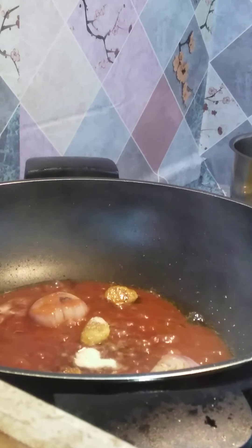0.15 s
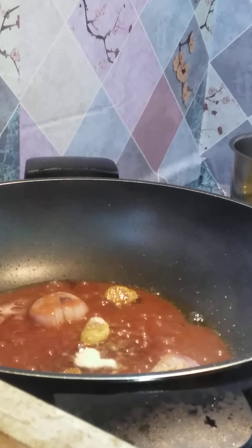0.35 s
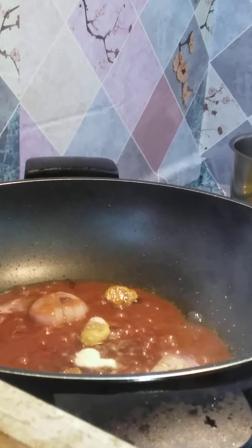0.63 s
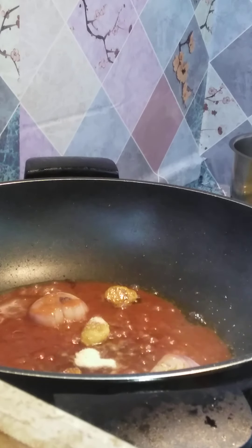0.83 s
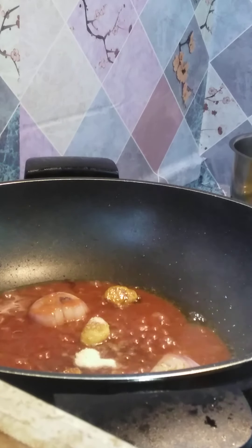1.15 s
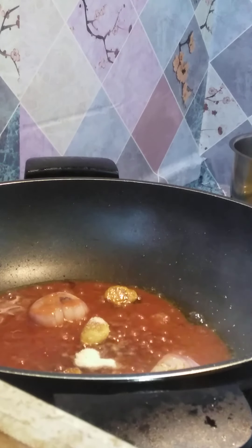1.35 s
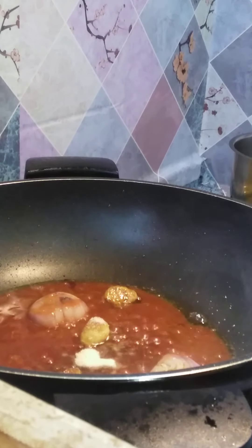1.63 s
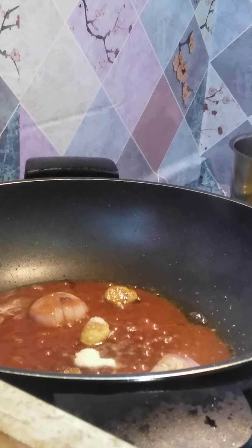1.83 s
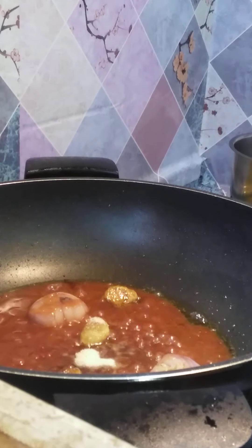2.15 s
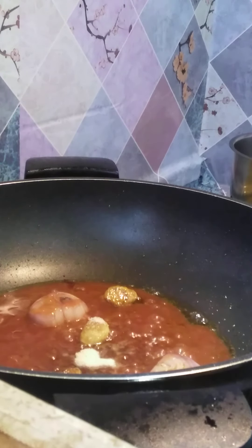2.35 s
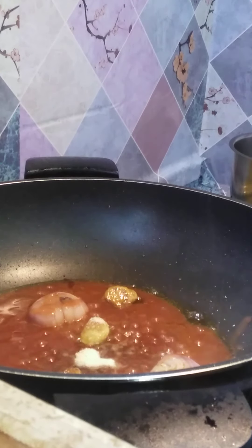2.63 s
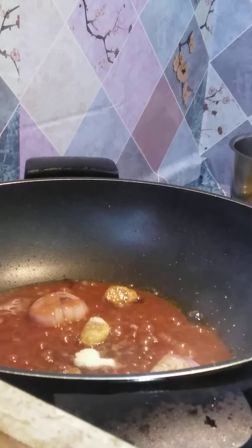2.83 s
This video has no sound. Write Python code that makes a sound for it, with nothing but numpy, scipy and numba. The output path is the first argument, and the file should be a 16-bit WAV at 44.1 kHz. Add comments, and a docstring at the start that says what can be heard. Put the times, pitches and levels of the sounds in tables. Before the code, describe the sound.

Thick sauce simmering in a wok, bubbling and crackling, with a pop and a knock.

```python
"""Sauce simmering in a wok

A thick sauce simmers in a small kitchen, heard by a phone close above the rim. Bubbles ring as tiny
resonators: the smallest fizz and flare up in spits, larger ones burble near 1 kHz, and one big one pops.
Something knocks across the room; a hum comes and goes. The spectra include the microphone's 9 kHz peak."""
import sys
import numpy as np
from scipy import signal
from scipy.fft import rfft, irfft
from scipy.io import wavfile
from scipy.ndimage import uniform_filter1d
from numba import njit

SR = 44100
rng = np.random.default_rng(int(sys.argv[2]) if len(sys.argv) > 2 else 0)


def store_wav(level_fs):
    """Save 16-bit WAV to argv[1]."""
    pcm = np.round(np.clip(np.atleast_2d(level_fs), -1, 1) * 32767)
    wavfile.write(sys.argv[1], SR, pcm.T.astype(np.int16))


N = 132300

# Spectrum of the room's rumble. Each row: frequency in Hz, relative density in dB.
RUMBLE_SPECTRUM = [(15, -46), (25, 5), (102, 10.5), (345, 4.5), (425, -17), (538, 2), (609, -44),
                   (680, -39.5), (880, 17), (1500, -120)]
# Envelope of the hum. Each row: time in seconds, level in dB.
HUM_LEVELS = [(0.0, -48.5), (0.08, -53), (0.12, -61), (0.22, -44.5), (0.26, -67), (0.32, -56), (0.37, -72),
              (0.78, -98.5), (0.83, -55), (0.89, -46.5), (1.04, -79), (1.38, -72), (1.43, -48.5),
              (1.72, -76), (1.75, -86), (1.84, -59), (1.94, -95), (1.99, -54), (2.01, -47), (2.06, -74),
              (2.18, -58), (2.31, -81), (2.33, -61), (2.51, -87), (2.55, -77), (3.0, -81)]
# Spectrum of the knock. Each row: frequency in Hz, relative density in dB.
KNOCK_SPECTRUM = [(35, -56), (60, -20), (730, -11), (988, -8.5), (1310, -12), (1610, 0), (2890, -12.5),
                  (3740, -14.5), (4200, -18.5), (6110, -19.5), (7020, -19), (8670, -10), (15900, -52)]
# Resonances of the knocked object. Each row: frequency in Hz, width in Hz, relative level in dB.
KNOCK_RESONANCES = [(960, 180, 10), (1602, 13, 18), (1680, 47, -11), (2150, 120, 21), (2320, 120, -13),
                    (2460, 40, -22)]
# Spectrum of the mid-sized bubbles. Each row: frequency in Hz, relative density in dB.
BURBLE_SPECTRUM = [(330, -60), (560, -34), (625, -31), (812, -3), (1040, 0), (1360, -5.5), (1620, -4),
                   (2020, -8.5), (2220, -7.5), (3200, -27), (4160, -32), (7040, -120)]
# Envelope of the burble. Each row: time in seconds, level in dB.
BURBLE_LEVELS = [(0.0, -43), (0.18, -46.5), (0.32, -45), (0.56, -48), (0.93, -44), (1.31, -48), (1.69, -45),
                 (1.91, -47), (2.55, -46), (2.72, -44), (3.0, -45)]
# Larger bubbles breaking. Each row: start in seconds, relative level in dB, centre in Hz,
# length in seconds.
BREAKING_BUBBLES = [(0.139, -37, 955, 0.034), (0.272, -27.5, 1000, 0.016), (0.333, -24.5, 1320, 0.022),
                    (0.814, -46, 1030, 0.027), (0.87, -37, 1110, 0.014), (0.902, -28.5, 1180, 0.0086),
                    (0.937, -25.5, 2650, 0.021), (1.136, -47, 1210, 0.015), (1.163, -26, 1630, 0.018),
                    (1.235, -41, 1010, 0.016), (1.592, -22.5, 1110, 0.025), (1.957, -28.5, 1120, 0.011),
                    (1.999, -40, 970, 0.023), (2.19, -26.5, 1600, 0.023), (2.544, -19.5, 1560, 0.017),
                    (2.75, -31, 1850, 0.022), (2.846, -30.5, 1440, 0.031), (2.929, -38, 970, 0.017)]
# Low gurgles. Each row: start in seconds, level in dB, centre in Hz, length in seconds.
LOW_GURGLES = [(.46, -62, 275, 0.08), (.53, -61.5, 620, 0.064), (.63, -58.5, 565, 0.034),
               (.68, -61, 273, 0.079), (.95, -66, 276, 0.062), (1.1, -76, 270, .06),
               (1.53, -59.5, 332, 0.094), (1.55, -53, 483, 0.024), (1.692, -37.5, 335, .03),
               (2.54, -53.5, 560, 0.049), (2.93, -63, 512, .07)]
# Spectrum of the tiny bubbles. Each row: frequency in Hz, relative density in dB.
FIZZ_SPECTRUM = [(1530, -33), (2600, -16), (5100, -19), (7010, -11.5), (8540, -1), (10700, -6),
                 (11900, -13), (15100, -22.5), (15900, -25)]
# Envelopes of the fizz. Each row: time in seconds, upper treble level in dB, lower treble level in dB.
FIZZ_LEVELS = [(0.0, -40.5, -48.5), (0.48, -40, -55.5), (0.78, -40.5, -54), (1.49, -39.5, -53.5),
               (1.62, -36, -51), (1.9, -43.5, -56.5), (2.19, -36, -50), (2.49, -41.5, -55),
               (2.73, -39, -50.5), (3.0, -41, -56)]
# Spectrum of the big bubble's pop. Each row: frequency in Hz, relative density in dB.
POP_SPECTRUM = [(35, -48), (60, -36), (362, -8), (747, -18.5), (1770, 2), (2090, -14.5), (3330, -26),
                (4110, -9), (4400, -19), (5180, -6.5), (7530, -9), (8870, 3), (15900, -31)]
# Spits of the sauce. Each row: start in seconds, relative level in dB, centre in Hz, top octave gain
# in dB, lower treble gain in dB, length in seconds, opening tick gain in dB.
SPIT_EVENTS = [(0.0114, -29, 8200, 3, -11, 0.022, -11), (0.07, -46, 10200, -17, -12, 0.022, -3),
               (0.077, -28, 8230, -6, -4.5, 0.017, -6), (0.139, -15, 8530, -16, -26, 0.015, 5),
               (0.18, -21, 9600, -16, -21, 0.022, -3), (0.3025, -17.5, 9940, -13, -12.5, 0.022, 3),
               (0.361, -26, 8900, -2, -20, 0.036, -3), (0.425, -29, 8850, -26, -20, 0.027, -3),
               (0.476, -24.5, 8900, -18, -14, 0.013, -7), (0.5232, -21.5, 8700, -24, -18, 0.0081, 7),
               (0.572, -18.5, 9920, -10, -37, 0.0088, -1), (0.614, -27, 9100, -8, -14, 0.018, -3),
               (0.633, -22.5, 9000, -23, -16, 0.025, 2), (0.679, -27.5, 8000, -19, -6, 0.035, -3),
               (0.758, -21.5, 8400, -19, -42, 0.029, -3), (0.7844, -29, 7840, 1, -32, 0.026, -3),
               (0.941, -17.5, 8360, -7, -19, 0.015, -9), (0.97, -15, 8400, -17, -36, 0.016, -3),
               (0.9845, -15, 9060, -15, -48, 0.022, 14), (1.04, -27.5, 8400, -21, -35, 0.043, -5),
               (1.058, -29, 10500, -21, -20, 0.017, -5), (1.1025, -25.5, 8650, -18, -6, 0.017, 1),
               (1.1247, -20, 10500, -12, -29, 0.015, 6), (1.1734, -46, 8620, -19, -21, 0.022, -5),
               (1.2397, -21, 8360, -32, -14.5, 0.025, 2), (1.2984, -23, 9000, -23, -39, 0.019, 4),
               (1.319, -22.5, 8800, -27, -32, 0.024, -3), (1.39, -33, 8250, -21, -28, 0.019, -5),
               (1.437, -23, 9320, -5, -14, 0.0088, 1), (1.4715, -24, 8600, -5, -34, 0.03, -8),
               (1.491, -23.5, 9400, -13, -12.5, 0.038, 13), (1.543, -20, 9450, -6, -14, 0.014, 5),
               (1.5766, -19, 8700, 1.5, -20, 0.02, -6), (1.677, -18.5, 9400, -9, -29, 0.015, -6),
               (1.7205, -17, 9020, -33, -7, 0.016, -11), (1.825, -35, 10700, -26, -29, 0.017, -3),
               (1.8764, -14, 9160, -30, -33, 0.029, -1), (1.893, -24, 9100, -23, -36, 0.024, -7),
               (1.972, -21.5, 9140, -17, -31, 0.01, 1), (1.989, -23, 9100, -9, -15, 0.033, -3),
               (2.0847, -19, 8340, -31, -11, 0.017, 10), (2.165, -23.5, 6300, -27, -19, 0.017, 1),
               (2.1975, -14.5, 8960, -31, -27, 0.018, -5), (2.2114, -21.5, 9400, -35, -33, 0.034, -7),
               (2.366, -21.5, 8770, -18, -18, 0.029, -11), (2.475, -26, 8850, -17, -21, 0.022, -3),
               (2.5412, -13.5, 8360, -14, -27, 0.022, 9), (2.582, -18, 10200, -11, -12.5, 0.034, 1),
               (2.605, -19, 8500, -16, -22, 0.019, 8), (2.6907, -18, 8690, -29, -31, 0.017, 7),
               (2.726, -30, 8800, -20, -25, 0.017, 0), (2.745, -25, 8600, -21, -24, 0.018, 1),
               (2.804, -19.5, 9700, -9, -13, 0.016, -7), (2.8504, -31, 8900, -26, -27, 0.013, -3),
               (2.873, -19.5, 8700, -19, -19, 0.019, -3), (2.9104, -34.5, 9100, -24, 3.5, 0.033, 1),
               (2.9604, -26, 9090, -21, -14, 0.022, -3), (2.991, -19, 9000, -9, -31, 0.022, -3)]


def undb(db):
    """Decibels are logarithmic: every 20 dB multiplies the amplitude by ten."""
    return 10 ** (np.asarray(db) / 20)


def unit(x):
    """Normalisation to an rms of 1."""
    return x / np.sqrt(np.mean(x ** 2))


def envelope(rows):
    """Gain over time, interpolated between (seconds, dB) points."""
    return undb(np.interp(np.arange(N) / SR, *np.array(rows).T))


def colour(x, spectrum):
    """Spectral shaping through (Hz, dB) points; rms 1."""
    points_hz, points_db = np.array(spectrum).T
    hz = np.maximum(np.arange(len(x) // 2 + 1) * SR / len(x), 1)
    gain = undb(np.interp(np.log(hz), np.log(points_hz), points_db, left=-90, right=-90))
    return unit(irfft(rfft(x) * gain, len(x)))


def resonate(x, hz, width_hz):
    """Two equal resonators in cascade pass a band around hz; rms 1."""
    f = np.arange(len(x) // 2 + 1) * SR / len(x)
    return unit(irfft(rfft(x) / (1 + 2j * (f - hz) / width_hz) ** 2, len(x)))


def clicks(size, per_s, scatter_db):
    """Shot noise: dense random impulses, a few much stronger than the rest."""
    chance, polarity, strength = rng.random((3, size))
    impulses = (chance < per_s / SR) * np.sign(polarity - .5)
    return impulses * undb(-scatter_db * np.log(1 - strength)) + 1e-9 * polarity


def wander(per_s):
    """Slow random modulation: ramps between per_s values a second; rms 1."""
    hold = int(SR / per_s)
    steps = np.repeat(rng.standard_normal(N // hold + 1), hold)
    return unit(uniform_filter1d(steps, hold)[:N])


def patchy(x, depth_db=2.2):
    """Independent amplitude modulation: each tenth of an octave swells and sinks on its own."""
    spectrum = rfft(x)
    tenths = 10 * np.log2(np.arange(1, N // 2 + 2) * SR / N / 600)  # counted from 600 Hz
    bands = (irfft(spectrum * np.clip(1 - np.abs(tenths - k), 0, 1), N) for k in range(-2, 49))
    return sum(band * undb(depth_db * wander(per_s=7.61)) for band in bands)


def add(out, start_s, x):
    """Superposition: x joins the mix at start_s."""
    i = int(start_s * SR)
    out[i:i + len(x)] += x[:N - i]


def burst(attack_s, length_s, size=8192):
    """Transient envelope: a quick rise, a short plateau, then decay with time constant length_s / 2."""
    t = np.arange(size) / SR
    rise = 1 - np.exp(-t / attack_s)
    return rise / np.sqrt(1 + np.exp(np.minimum(4 * (t / length_s - 1), 50)))


def reverberation(spectrum, t60_s, hold_s):
    """Diffuse decay: noise holds, then bass, middle and treble each fall 60 dB in their own t60_s."""
    t = np.arange(1 << 15) / SR
    noise = colour(rng.standard_normal(len(t)), spectrum)
    bass, below_treble = (signal.sosfilt(signal.butter(2, hz, fs=SR, output="sos"), noise)
                          for hz in (700, 2800))
    bands = bass, below_treble - bass, noise - below_treble
    tail = sum(band * undb(-60 * np.maximum(t - hold_s, 0) / s) for band, s in zip(bands, t60_s))
    return tail * np.minimum(t / 0.00045, 1)


@njit
def ringing_bubbles(start, hz, amplitude, cycles, glide):
    """Damped oscillators: over `cycles` periods each falls 17 dB as pitch rises by the fraction glide."""
    out = np.zeros(N)
    for k in range(len(start)):
        span, phase = cycles * SR / hz[k], 0.
        for i in range(min(int(2.5 * span), N - start[k])):
            phase += 2 * np.pi * hz[k] * (1 + glide * i / span) / SR
            shape = np.exp(-2 * i / span) * min(8 * i / span, 1.)
            out[start[k] + i] += amplitude[k] * np.sin(phase) * shape
    return out


def bubble_cloud(spectrum, count, low_hz, high_hz, cycles, glide, scatter_db):
    """Incoherent sum of many ringing bubbles, whitened and then shaped to a spectrum; rms 1."""
    when, pitch, strength = rng.random((count, 3)).T
    start = (when * N).astype(np.int64)
    hz = low_hz + (high_hz - low_hz) * pitch ** 1.3
    cloud = rfft(ringing_bubbles(start, hz, undb(scatter_db * strength), cycles, glide))
    smoothed_power = uniform_filter1d(np.abs(cloud) ** 2, size=900)
    return colour(irfft(cloud / np.sqrt(smoothed_power + 1e-9), N), spectrum)


def rumble():
    """Low-frequency background noise of the room, drifting slowly in level."""
    return undb(-71 + 4 * wander(per_s=8.47)) * colour(rng.standard_normal(N), RUMBLE_SPECTRUM)


def hum(hz=99):
    """Beating: a low tone interferes with narrow-band noise at the same pitch, so it wavers."""
    t = np.arange(N) / SR
    tone = np.sin(2 * np.pi * hz * t)
    roughness = .7 * resonate(rng.standard_normal(N), hz, width_hz=20)
    return unit(tone + roughness) * envelope(HUM_LEVELS)


def knock(start_s=1.7195, hold_s=.016, middle_t60_s=0.22):
    """Modal ringing: a hollow knock whose resonances arrive smeared by the room's reverberation."""
    out, t = np.zeros(N), np.arange(1 << 15) / SR
    modes = sum(undb(db) * resonate(rng.standard_normal(len(t)), hz, width_hz)
                for hz, width_hz, db in KNOCK_RESONANCES)
    decay = undb(-60 * np.maximum(t - hold_s, 0) / middle_t60_s)
    room = reverberation(KNOCK_SPECTRUM, t60_s=(0.36, middle_t60_s, 0.2), hold_s=hold_s)
    add(out, start_s, undb(-20.5) * (room + undb(-9) * unit(modes) * decay))
    return out


def burble():
    """Bubble resonance: mid-sized bubbles ring near 1 kHz, while larger ones break and gurgle."""
    cloud = bubble_cloud(BURBLE_SPECTRUM, count=9000, low_hz=600, high_hz=3400,
                         cycles=20.5, glide=.03, scatter_db=2)
    out = patchy(cloud) * envelope(BURBLE_LEVELS)
    for start_s, db, hz, length_s in BREAKING_BUBBLES:
        bloop = resonate(clicks(8192, per_s=2500, scatter_db=1.05), hz, width_hz=550)
        add(out, start_s, undb(db - 16.5) * burst(0.00067, length_s) * bloop)
    for start_s, db, hz, length_s in LOW_GURGLES:
        gurgle = resonate(rng.standard_normal(16384), hz, width_hz=100)
        add(out, start_s, undb(db) * burst(0.0038, length_s, len(gurgle)) * gurgle)
    return out


def fizz(split_hz=6200, flicker_db=.6):
    """Smaller bubbles resonate higher: countless tiny ones merge into a slightly flickering hiss."""
    cloud = bubble_cloud(FIZZ_SPECTRUM, count=45000, low_hz=2300, high_hz=16500,
                         cycles=60.5, glide=.02, scatter_db=2.5)
    spectrum, levels = rfft(cloud), np.array(FIZZ_LEVELS)
    is_lower = np.arange(N // 2 + 1) * SR / N < split_hz
    upper_treble = unit(irfft(spectrum * ~is_lower, N)) * envelope(levels[:, [0, 1]])
    lower_treble = unit(irfft(spectrum * is_lower, N)) * envelope(levels[:, [0, 2]])
    return patchy(upper_treble + lower_treble) * undb(flicker_db * wander(per_s=30.26))


def pop(start_s=.1712, crack_s=.0013, thump_hz=341, thump_s=0.0028, boom_t60_s=0.3):
    """Impulse excitation: a big bubble bursts with a crack and a thump that echo in wok and kitchen."""
    out, t = np.zeros(N), np.arange(1 << 15) / SR
    echo = reverberation(POP_SPECTRUM, t60_s=(0.34, .14, 0.12), hold_s=0)
    crack_and_tail = np.exp(-t / crack_s) + undb(-13)
    add(out, start_s, undb(-6) * echo * crack_and_tail)
    thump = undb(-20) * np.sin(2 * np.pi * thump_hz * t) * np.exp(-t / thump_s)
    boom = resonate(rng.standard_normal(len(t)), thump_hz, width_hz=600)  # lingers in the room
    boom *= undb(-39.5 - 60 * t / boom_t60_s)
    add(out, start_s - .0015, thump + boom)  # just ahead of the crack
    return out


def spits(attack_s=0.0012, tick_s=0.001):
    """Filtered shot noise: flares of crackle open with a tick, each with its own pitch and brightness."""
    out, t = np.zeros(N), np.arange(8192) / SR
    for start_s, db, hz, top_db, low_db, length_s, tick_db in SPIT_EVENTS:
        crackle = clicks(len(t), per_s=12000, scatter_db=1.5)
        tick = 1 + undb(tick_db) * np.exp(-t / tick_s)
        shape = burst(attack_s, length_s)
        top_shape = burst(attack_s, .65 * length_s)  # the top octave dies sooner
        core = resonate(crackle, hz, width_hz=1960) * shape
        top_octave = undb(top_db) * resonate(crackle, 12800, width_hz=5000) * top_shape
        lower_treble = undb(low_db) * resonate(crackle, 5480, width_hz=3600) * shape
        spit = undb(-13.5) * core + undb(-13) * (top_octave + lower_treble)
        add(out, start_s, undb(db) * tick * spit)
    return out


def scene():
    """Superposition: the pressures of sauce and kitchen add in one channel."""
    return (fizz() + spits() + burble() + pop() + knock() + hum() + rumble())[None]


def record(dry, ceiling=.9):
    """Saturation and band limiting: the phone rounds the loudest peak, thins the bass, cuts the top."""
    rounded = ceiling * np.tanh(dry / ceiling)
    bass_cut = signal.butter(2, 78, "high", fs=SR, output="sos")
    top_cut = signal.ellip(10, .2, 80, 15900, fs=SR, output="sos")
    return signal.sosfilt(top_cut, signal.sosfilt(bass_cut, rounded))


dry = scene()
out = record(dry)
store_wav(out)
```